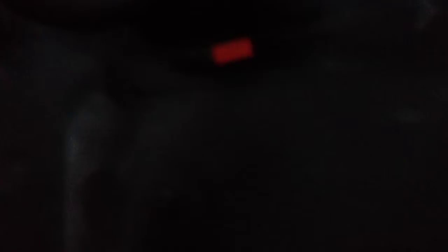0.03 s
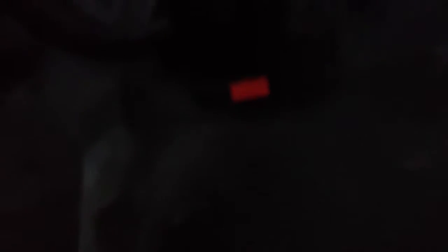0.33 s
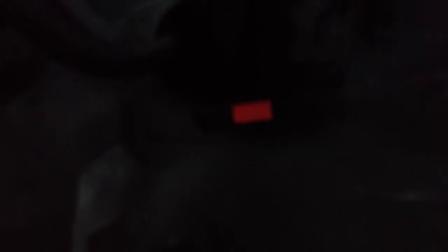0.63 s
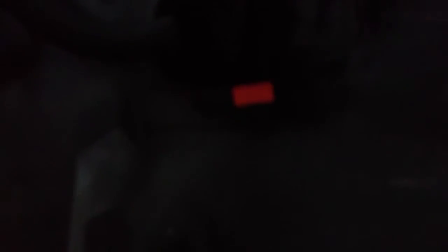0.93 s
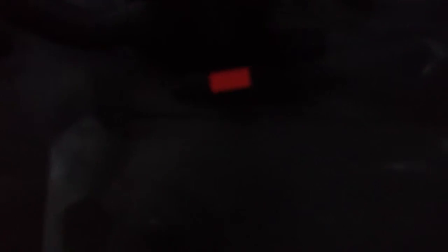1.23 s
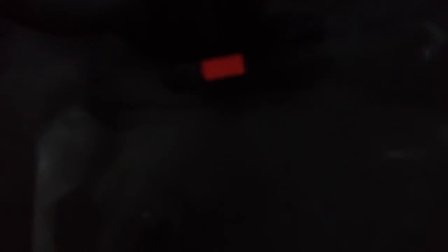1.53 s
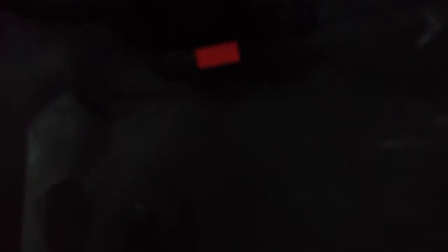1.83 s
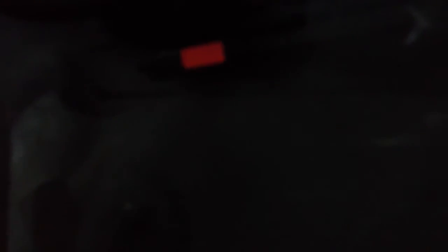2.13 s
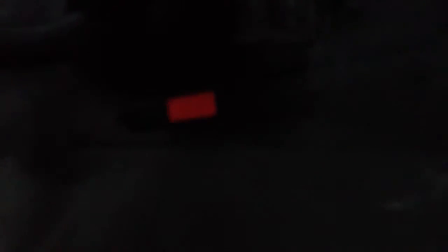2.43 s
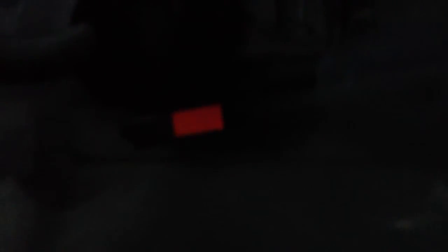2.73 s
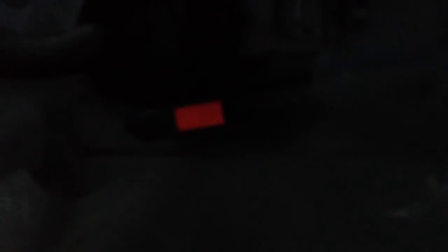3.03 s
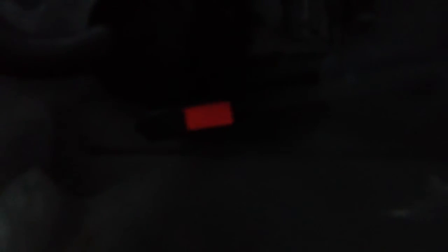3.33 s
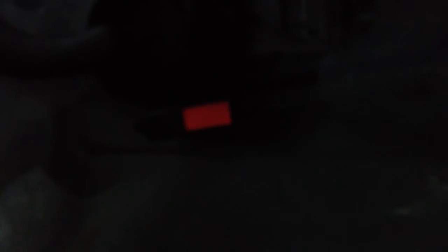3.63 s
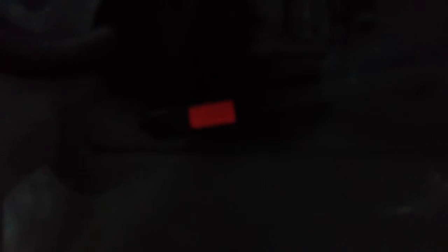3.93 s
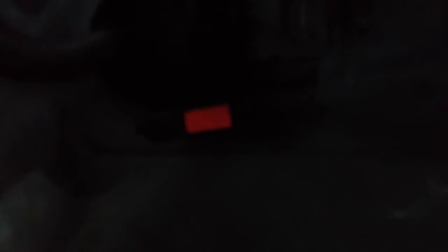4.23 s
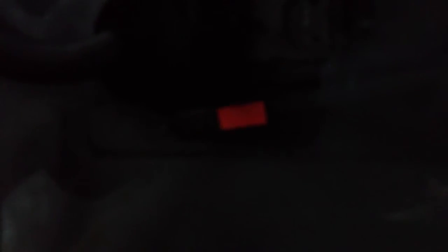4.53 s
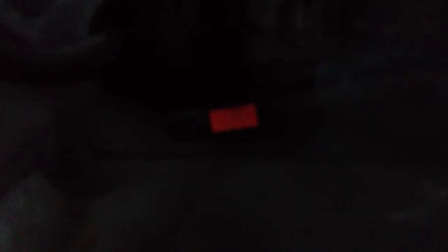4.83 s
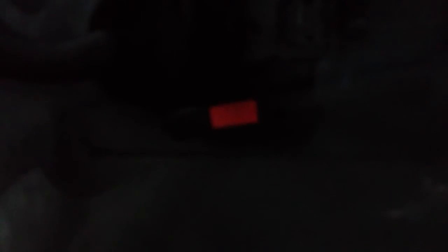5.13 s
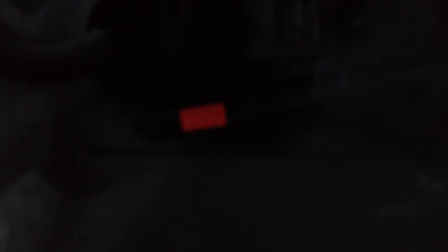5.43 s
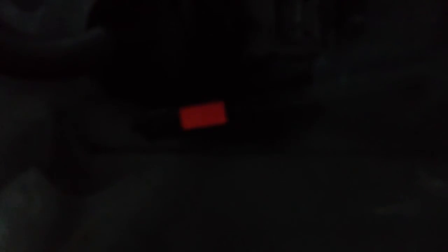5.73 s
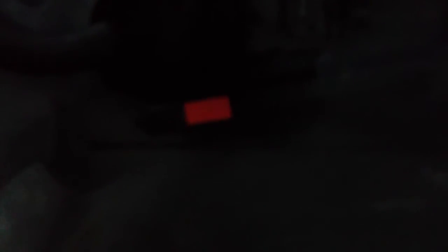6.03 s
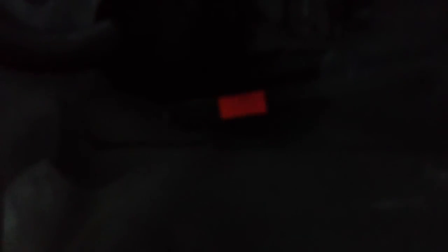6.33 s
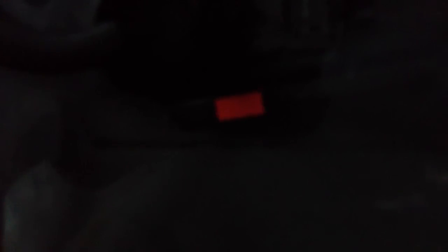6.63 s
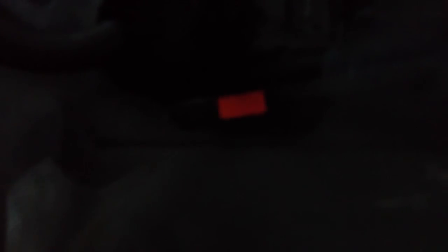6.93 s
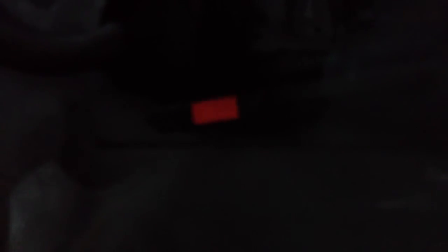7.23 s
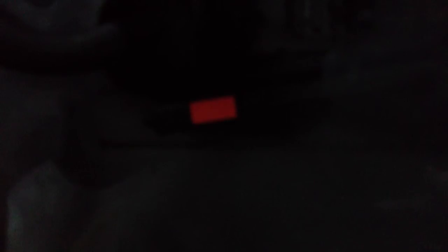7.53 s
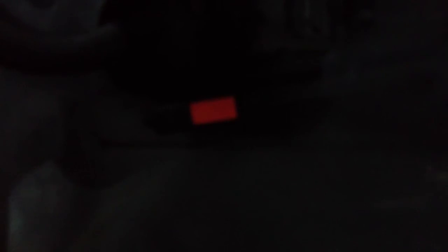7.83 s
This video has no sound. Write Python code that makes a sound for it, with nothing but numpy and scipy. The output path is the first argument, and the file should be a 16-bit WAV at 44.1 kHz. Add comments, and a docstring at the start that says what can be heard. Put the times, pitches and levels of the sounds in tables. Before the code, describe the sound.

Inside a quiet parked car, faint hiss carries a few soft knocks of a hand on the trim and a barely audible thin whine. Then the power door locks work five times, about once a second. Each time a switch clicks, the linkages clatter, the door panels thud and small gears spring back and spin down. A sixth stroke begins at the very end. The sound is close and dry, heard from the seat.

```python
"""Faint hiss, soft knocks of a hand on the trim and a brief thin whine in a quiet parked car.
Then, close to one microphone at the seat, the power door locks work five times and a sixth stroke begins.
A switch clicks, the actuators throw their rattling linkages against the stops and the door panels boom.
A third of a second later the current drops: the gears spring back and coast down."""
import sys
import numpy as np
from scipy import signal
from scipy.fft import rfft, irfft, next_fast_len
from scipy.io import wavfile
from scipy.ndimage import uniform_filter1d, minimum_filter1d, map_coordinates

SR = 44100
rng = np.random.default_rng(int(sys.argv[2]) if len(sys.argv) > 2 else 0)


def pcm_store(signal):
    """Save signal as 16-bit PCM."""
    levels = np.round(np.clip(np.atleast_2d(signal), -1, 1) * 32767)
    wavfile.write(sys.argv[1], SR, levels.astype(np.int16).T)


N = 352800
TIME = np.arange(N) / SR
AGE = np.arange(SR * 5 // 8) / SR  # seconds since an event began

# spectrum of the hiss: (frequency [Hz], relative level [dB])
HISS_SPECTRUM = [(25, -22), (60, -15), (90, -11), (130, -3.5), (220, -3.5), (400, -8), (700, -10),
                 (1400, -12), (3000, -11.5), (5200, -9), (6600, -10.5), (15500, -12)]
# hand on the trim: (time [s], relative level [dB], tilt [dB/octave], t60 [s])
HAND_KNOCKS = [(0.242, -59.5, -6, 0.16), (0.306, -51.5, -0.3, 0.061), (0.614, -66.5, -5, 0.13),
               (1.812, -52, 1.5, 0.08), (1.867, -61.5, 4, 0.39), (1.955, -61.5, -0.5, 0.051),
               (2.015, -58.5, -2, 0.11), (2.122, -59, -1.5, 0.12), (2.259, -56.5, -1, 0.095),
               (2.325, -64.5, -4.5, 0.21), (2.473, -68.5, 1.5, 0.29), (4.219, -58, -4, 0.1)]
# spectrum of a knock: (frequency [Hz], relative level [dB])
HAND_SPECTRUM = [(40, -39), (90, -5), (150, -4), (290, 3.5), (600, -9), (1100, -6), (1700, -4),
                 (2500, -8.5), (3600, -8.5), (6000, -19.5), (15000, -37)]
# hollow trim under the hand: (frequency [Hz], width [Hz], gain [dB])
TRIM_MODES = [(269, 200, -2), (364, 310, -13), (563, 83, 4), (846, 80, 0), (1460, 98, -5), (2240, 170, 2)]
# path the whine wavers around: (time [s], pitch [Hz], level [dB])
WHINE_PATH = [(.72, 1290, -95), (.82, 1265, -78), (1.0, 1215, -80), (1.2, 1200, -82), (1.4, 1160, -81),
              (1.66, 1175, -81), (1.781, 1170, -92)]
# switches and latches, levels relative: (time [s], first click [dB], gap [s], second click [dB],
# treble [dB], midrange [dB])
CLICK_PAIRS = [(3.0774, -56, .003, -57, -20, -12), (3.1544, -46.5, 0.0047, -55, -9, -2),
               (3.3547, -52, 0.026, -45.5, -1.5, -16.5), (3.911, -49.5, 0.029, -50, -9, -10.5),
               (4.092, -29, 0.045, -49, -0.5, -24.5), (4.698, -45, 0.021, -41, -3, -10.5),
               (5.6865, -37.5, .02, -47, 1.5, -5), (6.160, -43, 0.0033, -36.5, -10.5, -11),
               (6.4895, -50.5, 0.047, -52, -6.5, -13), (7.045, -36.5, 0.029, -48, -7.5, -7),
               (7.444, -51.5, 0.026, -49.5, -3.5, -13.5), (7.8642, -32, .005, -49, -1.5, -25.5)]
# plastic switch body: (frequency [Hz], width [Hz], gain [dB])
SWITCH_MODES = [(3200, 190, 0), (4220, 160, -2.5), (7170, 350, 1), (7900, 700, -4.5), (10800, 240, -15),
                (12100, 500, -2)]
# lock strokes: (time [s], clatter [dB], travel [s], settling t60 [s], engaging click [dB], slap [dB],
# seating clack [dB], clatter tilt [dB/octave], door cavity [dB], ringing rods [dB])
LOCK_STROKES = [(3.171, -29, 0.064, 0.082, -44, -49, -64, -0.15, -48, -80),
                (4.305, -29, 0.081, 0.16, -40, -24, -47, -2, -38.5, -47),
                (5.309, -29, 0.1, 0.11, -46, -27, -44.5, -1, -36, -68),
                (6.241, -29.5, 0.086, 0.16, -38, -30.5, -49, 0.5, -37.5, -58),
                (7.147, -29.5, 0.11, 0.11, -34.5, -26, -40, -0.7, -38.5, -70),
                (7.987, -26.5, .090, .15, -44.5, -34, -55, -1, -37, -65)]
# spectrum of the linkage contacts: (frequency [Hz], relative level [dB])
LINKAGE_SPECTRUM = [(60, -52), (150, 5), (300, -3), (700, -2.5), (1400, -4), (2000, -4), (2700, -5),
                    (4300, -4.5), (6500, -9), (7600, -12), (10000, -19), (15000, -31.5)]
# linkage and door shell: (frequency [Hz], width [Hz], relative gain [dB])
SHELL_MODES = [(428, 24, 0), (577, 25, -3), (838, 45, -4), (980, 33, 4.5), (1232, 65, 4.5), (1620, 70, -3),
               (1745, 55, -1), (1860, 55, 3.5), (2047, 45, 0), (2410, 70, 0), (2908, 40, -2),
               (3460, 130, 0), (3812, 40, -1), (4036, 40, -2), (4190, 60, -5), (5400, 80, -3),
               (6210, 140, 0)]
# steel rods: (frequency [Hz], relative level [dB], t60 [s])
ROD_MODES = [(5453, 0, .36), (7849, -2, .40), (9695, -7, .36), (10815, -2, .34), (11558, -8, .36)]
# spectrum of the latch seating: (frequency [Hz], relative level [dB])
CLACK_SPECTRUM = [(500, -30), (3000, -17), (7000, 8), (12000, 0), (15000, -12)]
# two doors reach their stops in turn: (time [s], first door [dB], lag [s], second door [dB], rise [s],
# side mode gain [dB], recoil [dB])
END_STOPS = [(3.237, -36, .021, -38.5, 0.025, -12.5, -83), (4.360, -32.5, 0.04, -31, 0.0089, 0.5, -46),
             (5.377, -32, 0.024, -24.5, 0.0079, -3.5, -42.5), (6.296, -39, .047, -34.5, 0.018, 0.5, -44.5),
             (7.210, -29.5, 0.034, -23, 0.0098, -5.5, -43.5)]
# door panel, main mode first: (nominal frequency [Hz], relative level [dB], t60 [s])
PANEL_MODES = [(193, 0, .24), (171, -8, .26), (155, -13, .21), (116, -27, .28), (208, -8, .22),
               (272, -11, .23), (313, -11, .23), (424, -18, .18)]
# spectrum of loose trim shaken by the panel: (frequency [Hz], relative level [dB])
SHUDDER_SPECTRUM = [(30, -27), (100, -23), (160, -0.5), (270, -9), (450, -23.5), (700, -18), (1500, -47.5)]
# gears spring back: (time [s], panel knock [dB], coasting [dB], rebound delay [s], gain at 550 Hz [dB])
GEAR_RELEASES = [(3.520, -69, -61.5, 0.092, -1), (4.655, -51.5, -63.5, 0.13, 6),
                 (5.660, -53.5, -61.5, 0.085, -5), (6.595, -50, -63, .135, 9.5),
                 (7.501, -57, -61.5, 0.09, -4)]
# spectrum of the gears snapping back: (frequency [Hz], relative level [dB])
SNAP_SPECTRUM = [(80, -56), (170, 4), (320, -10), (600, 1.5), (850, -4.5), (1300, -8), (2100, -6),
                 (2700, -7.5), (3500, -8.5), (5200, -8.5), (8000, -18.5), (15000, -23)]
# spectrum of the gears coasting: (frequency [Hz], relative level [dB])
COAST_SPECTRUM = [(50, -24), (140, 12.5), (300, 1.5), (700, 7), (1300, 4), (1900, 2.5), (2600, -8),
                  (4000, -2.5), (7000, -38), (15000, -41)]


def amp(db):
    """Decibels to gain."""
    return 10 ** (np.asarray(db) / 20)


def unit(x):
    """Scale to rms 1."""
    return x / np.sqrt(np.mean(x ** 2) + 1e-20)


def colour(points, hz, tilt=0):
    """Gain of a spectrum table at hz, tilted about 2 kHz in dB per octave."""
    knots, db = np.transpose(points)
    octaves = np.log2(np.maximum(hz, 120) / 2000)
    return amp(np.interp(np.log(hz + 1), np.log(knots), db) + tilt * octaves)


def filtered(x, response):
    """Apply a response given as a function of frequency."""
    size = next_fast_len(len(x) + 8192)
    return irfft(rfft(x, size) * response(np.fft.rfftfreq(size, 1 / SR)), size)[:len(x)]


def shaped(x, spectrum, tilt=0):
    """Colour a sound with a spectrum table, at rms 1."""
    return unit(filtered(x, lambda hz: colour(spectrum, hz, tilt)))


def resonate(x, modes, direct):
    """Sound passes through a body: partly direct, partly through its resonances."""
    def response(hz):
        return direct + sum(amp(db) * 1j * hz * width / (centre ** 2 - hz ** 2 + 1j * hz * width)
                            for centre, width, db in modes)
    return filtered(x, response)


def wobble(rate, size):
    """A smooth random curve, rate knots a second."""
    knots = rng.standard_normal(int(size * rate / SR) + 4)
    return map_coordinates(knots, [np.arange(size) * rate / SR])


def add(track, s, sound):
    """Mix a sound into the track at time s."""
    part = track[round(s * SR):][:len(sound)]
    part += sound[:len(part)]


def swell(rise, t60):
    """Builds up over the rise time, rounds off and dies away."""
    up = (AGE / rise) ** 2
    down = 1000 ** (-(AGE - rise) / t60)
    return up * down / np.hypot(up, down)


def drive(rise, travel, t60, sag_db_per_s):
    """Builds up, sags steadily while the part travels, then dies away."""
    up = (AGE / rise) ** 2
    sag = amp(-sag_db_per_s * np.clip(AGE - rise, 0, max(travel - rise, 0)))
    down = 1000 ** (-np.maximum(AGE - travel, 0) / t60)
    return up / np.hypot(up, 1) * sag * down


def contacts(rate, blur):
    """A run of tiny random impacts, rate a second, blurred by reflections."""
    hits = (rng.random(len(AGE)) < rate / SR) * rng.standard_normal(len(AGE))
    return unit(unit(hits) + blur * rng.standard_normal(len(AGE)))


def hiss():
    """Steady hiss at the microphone, with a slight hump near 6 kHz."""
    hump = lambda hz: 1 + 0.5 / (1 + ((hz - 5850) / 250) ** 2)
    noise = filtered(rng.standard_normal(N), lambda hz: colour(HISS_SPECTRUM, hz) * hump(hz))
    return amp(-66.5) * unit(noise)


def hand_knocks():
    """A hand knocks softly on the hollow trim, with a few fainter touches as it settles."""
    out = np.zeros(N)
    touches = [(s, -71, -4, .12) for s in rng.uniform(2.28, 2.72, size=5)]
    for s, db, tilt, t60 in HAND_KNOCKS + touches:
        knock = shaped(contacts(rate=3900, blur=.3), HAND_SPECTRUM, tilt)
        add(out, s, amp(db + 3.5) * knock * swell(.003, t60))
    return resonate(out, TRIM_MODES, direct=.7)


def whine():
    """A faint thin tone wavers and sags in pitch for about a second."""
    s, hz, db = np.transpose(WHINE_PATH)
    pitch = np.interp(TIME, s, hz) + 26 * wobble(70, N)
    level = amp(np.interp(TIME, s, db) + 2.2 * wobble(21.7, N))
    sounding = (TIME > s[0]) & (TIME < s[-1])
    return sounding * level * np.sin(2 * np.pi * np.cumsum(pitch) / SR)


def switch_clicks():
    """Switches and latches click as they give and again as they seat, ringing the plastic."""
    out = np.zeros(N)
    envelope = swell(.00043, .016) + .27 * swell(.00094, .072)  # the click and its near reflections
    for s, first_db, gap, second_db, treble_db, mid_db in CLICK_PAIRS:
        spectrum = [(100, -9), (500, mid_db + 10), (2200, mid_db + 11.5), (4000, 1), (6000, -2),
                    (7700, 0), (9500, treble_db), (15000, treble_db)]
        for delay, db in (0, first_db), (gap, second_db):
            click = shaped(rng.standard_normal(len(AGE)), spectrum)
            add(out, s + delay, amp(db - 1.5) * click * envelope)
    return resonate(out, SWITCH_MODES, direct=.77)


def door_shell(x, direct):
    """Each blow lands elsewhere on the door and rings its resonances at new strengths."""
    modes = [(hz, width, db + rng.normal(2, 2)) for hz, width, db in SHELL_MODES]
    return unit(resonate(x, modes, direct))


def rattle(tilt, band):
    """Dense contacts of the linkage, heard through the door shell within a band."""
    hits = contacts(rate=2200, blur=.8)
    linkage = filtered(hits, lambda hz: colour(LINKAGE_SPECTRUM, hz, tilt) * band(hz))
    return door_shell(linkage, direct=.55)


def rod_ring(rise):
    """The slapped steel rods ring on in a few high modes."""
    ring = np.zeros(len(AGE))
    for hz, db, t60 in ROD_MODES:
        level = amp(db + rng.normal(0, 1.7))
        ring += level * np.sin(2 * np.pi * (hz * AGE + rng.random())) * swell(rise, t60)
    return ring


def lock_strokes():
    """The motor engages with a click and slaps the play out of the rods; they clatter home and seat."""
    out = np.zeros(N)
    slack_s, slap_delay_s, slap_rise_s = .003, .012, .015
    cavity_hz = 700  # the hollow door answers below this pitch, more slowly
    low = lambda hz: 1 / np.hypot(1, (hz / cavity_hz) ** 3)
    shelf = lambda hz: np.hypot(.16, hz / np.hypot(1.3 * cavity_hz, hz))
    high = lambda hz: shelf(hz) * (1 - .57 * low(hz))
    for s, clatter_db, travel, t60, click_db, slap_db, clack_db, tilt, cavity_db, ring_db in LOCK_STROKES:
        click = rattle(tilt + 2.8, np.ones_like) * swell(.0024, .063)
        add(out, s, amp(click_db) * click)
        slap = rattle(tilt + 6.5, high) * drive(slap_rise_s, travel - slap_delay_s, t60, sag_db_per_s=368)
        add(out, s + slap_delay_s, amp(slap_db) * slap)
        clatter = rattle(tilt, high) * drive(.023, travel - slack_s, t60, sag_db_per_s=76.5)
        add(out, s + slack_s, amp(clatter_db) * clatter)
        clack = shaped(contacts(rate=3000, blur=.5), CLACK_SPECTRUM) * swell(.03, .09)
        add(out, s + travel - .025, amp(clack_db) * clack)  # the latch seats just before the travel ends
        cavity = rattle(3, low) * drive(.043, travel, t60=.15, sag_db_per_s=0)
        add(out, s, amp(cavity_db) * cavity)
        add(out, s + slap_delay_s, amp(ring_db) * rod_ring(slap_rise_s))
    return out


def panel_boom(rise, pitch_ratio, side_db):
    """The panel's close low modes start in opposite directions, so they swell and beat as they fade."""
    modes = [(-1) ** k * amp(db) * np.sin(2 * np.pi * hz * pitch_ratio * AGE) * swell(rise, t60)
             for k, (hz, db, t60) in enumerate(PANEL_MODES)]
    return modes[0] + amp(side_db) * sum(modes[1:])


def door_thuds():
    """The actuators hit their stops: each door booms and its trim shudders, then a panel recoils once."""
    out = np.zeros(N)
    for s, first_db, lag, second_db, rise, side_db, recoil_db in END_STOPS:
        for onset, db, pitch_ratio in (s, first_db, 1.03), (s + lag, second_db, 1.015):
            add(out, onset, amp(db) * panel_boom(rise, pitch_ratio, side_db))
            shudder = shaped(rng.standard_normal(len(AGE)), SHUDDER_SPECTRUM)
            add(out, onset, amp(db + side_db - 8) * shudder * swell(rise, .27))
        recoil = panel_boom(rise=.035, pitch_ratio=.94, side_db=-3)
        add(out, s + lag + .07, amp(recoil_db) * recoil)
    return out


def gear_releases():
    """Without current the gears snap back, nudge the panel, rebound once and spin down unevenly."""
    out = np.zeros(N)
    snap_envelope = np.hypot(.75 * swell(.0023, .29), 1.37 * swell(.016, .095))
    for s, knock_db, coast_db, rebound_delay, hollow_db in GEAR_RELEASES:
        hits = contacts(rate=4000, blur=1)
        hollow = [(300, 0), (550, hollow_db), (900, 0)]
        snap = filtered(hits, lambda hz: colour(SNAP_SPECTRUM, hz) * colour(hollow, hz))
        add(out, s, amp(-44.5) * door_shell(snap, direct=.6) * snap_envelope)
        rebound = shaped(contacts(rate=610, blur=1), LINKAGE_SPECTRUM)
        add(out, s + rebound_delay, amp(-58.5) * rebound * swell(.013, .082))
        whirr = door_shell(shaped(contacts(rate=610, blur=1), COAST_SPECTRUM), direct=3.6)
        uneven_db = 2.2 * wobble(35, len(AGE))
        add(out, s, amp(coast_db + uneven_db) * whirr * swell(.0095, 2.24))
        add(out, s, amp(knock_db) * panel_boom(rise=.054, pitch_ratio=1.04, side_db=-.89))
    return out


def scene():
    """The cabin from the seat, in mono; the upholstery leaves no reverberation."""
    cabin = hiss() + hand_knocks() + whine()
    locks = switch_clicks() + lock_strokes() + door_thuds() + gear_releases()
    return (cabin + locks)[None]


def record(dry):
    """The microphone chain opens after a moment, thins the bass, eases down peaks and cuts the top."""
    open_s, bass_hz, ceiling, top_hz = .115, 75, .135, 15550
    low_cut = signal.butter(2, bass_hz, "highpass", fs=SR, output="sos")
    mic = signal.sosfilt(low_cut, dry[0] * (TIME > open_s))
    needed_gain = np.minimum(1, ceiling / (np.abs(mic) + 1e-9))
    gain = uniform_filter1d(minimum_filter1d(needed_gain, size=200), size=200)
    return filtered(mic * gain, lambda hz: hz < top_hz)[None]


dry = scene()
out = record(dry)
pcm_store(out)
```